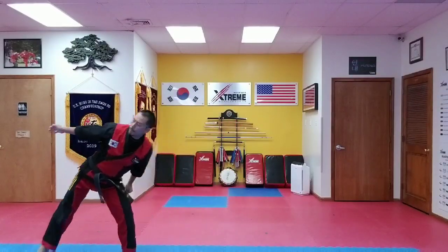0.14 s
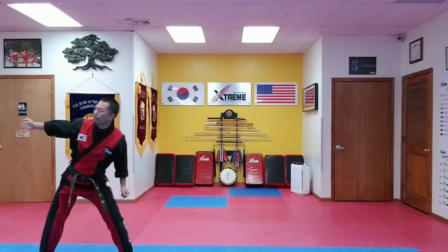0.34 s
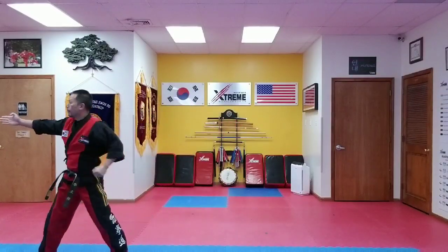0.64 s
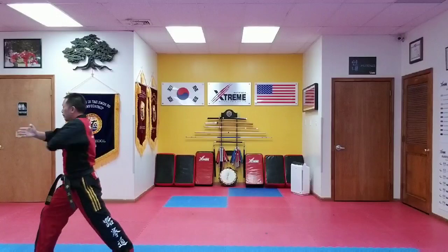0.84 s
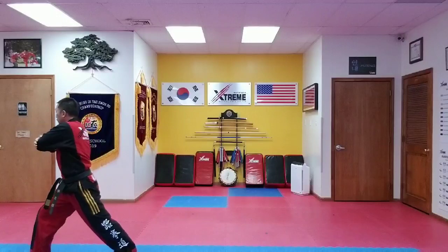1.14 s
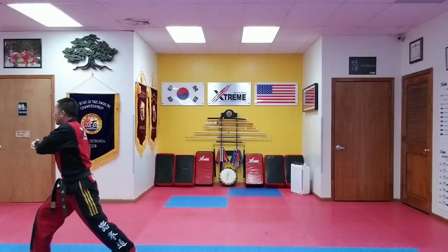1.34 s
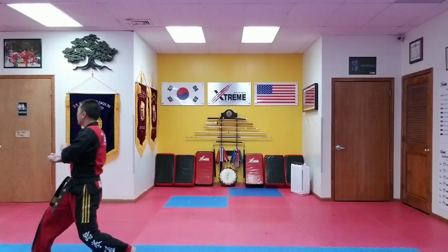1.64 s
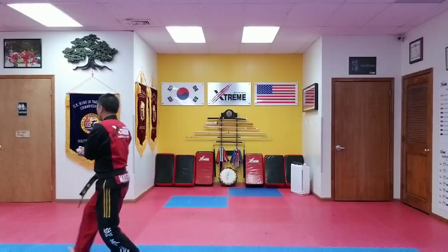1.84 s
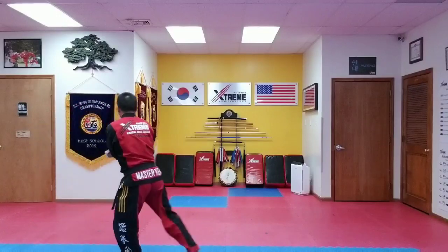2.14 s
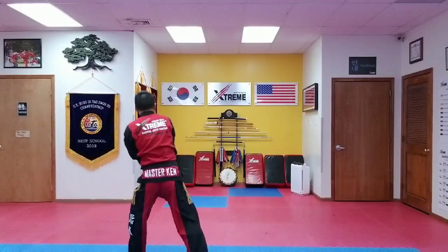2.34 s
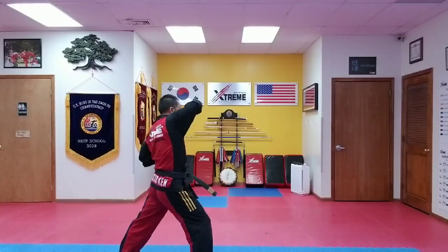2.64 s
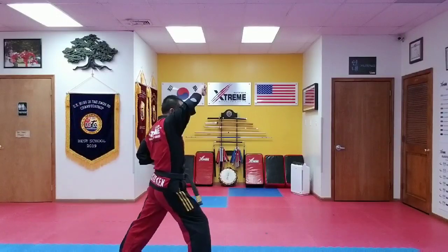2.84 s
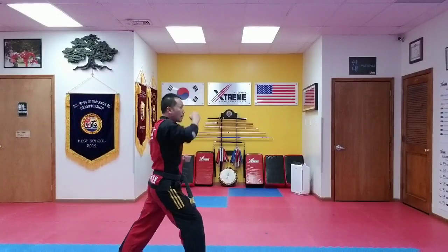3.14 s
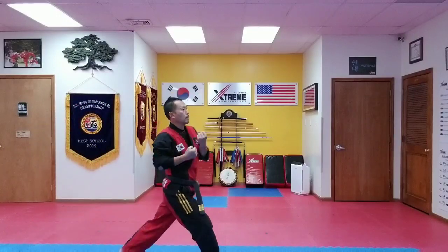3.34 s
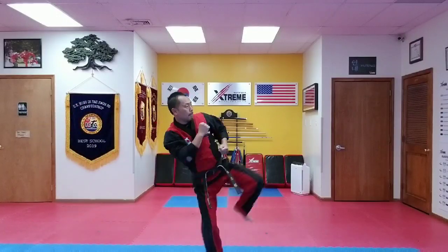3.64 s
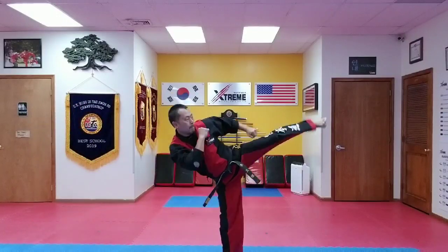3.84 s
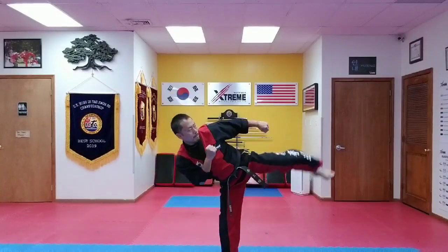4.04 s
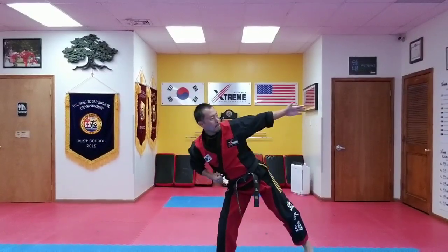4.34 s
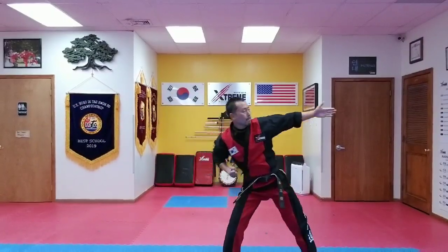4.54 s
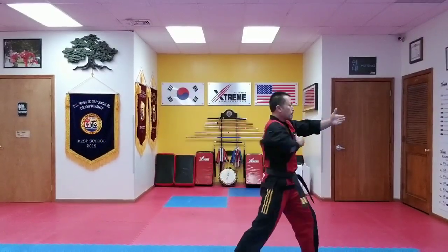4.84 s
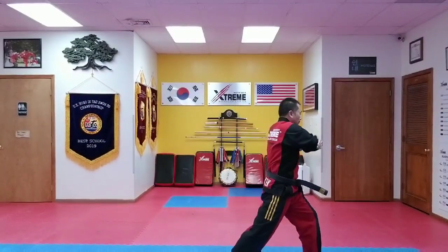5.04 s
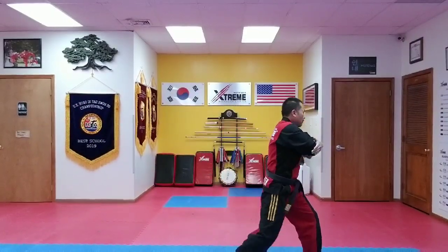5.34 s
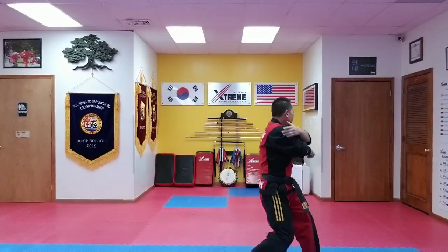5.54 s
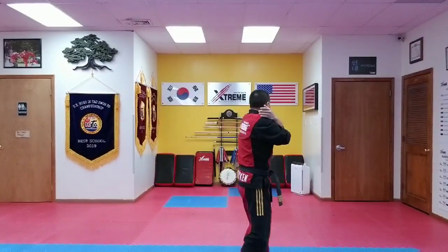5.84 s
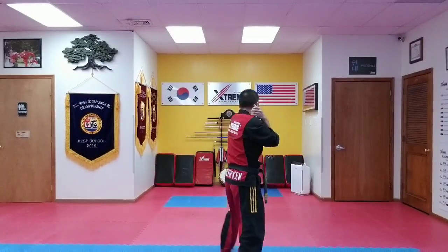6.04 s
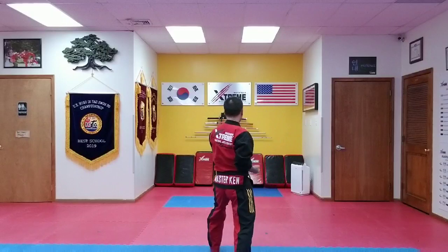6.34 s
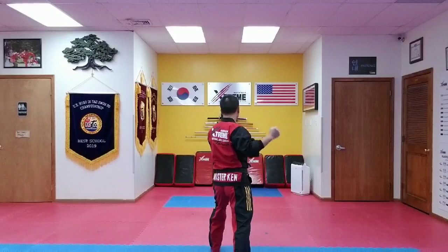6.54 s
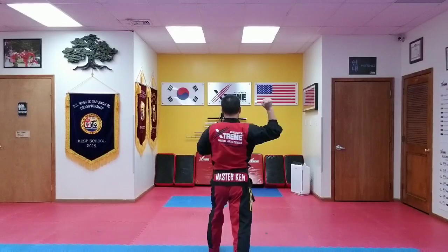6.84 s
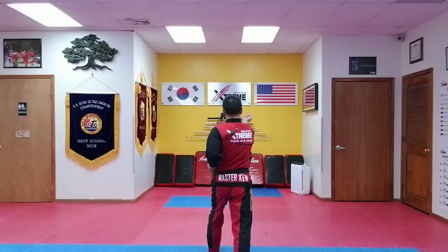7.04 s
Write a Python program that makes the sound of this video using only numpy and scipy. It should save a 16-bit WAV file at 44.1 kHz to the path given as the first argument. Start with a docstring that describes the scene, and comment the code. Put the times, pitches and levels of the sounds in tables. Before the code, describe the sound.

Steady throbbing ventilation lies under bursts of movement from one person on foam mats. Heavy uniform fabric swishes and snaps, bare soles slide in brief airy whisks, and weight lands with dull low thumps. An elbow smacks into a palm near the start and again, harder, past the middle. The room is small, with a quick reflective ring, heard in mono from a few metres away.

```python
"""Air conditioning hums and throbs throughout: beating tones over shaped duct and vent noise.
A martial artist runs through a form on foam mats in a small hall: heavy uniform and bare soles rustle
and brush (grainy noise driven by limb speed), weight lands in soft booms (decaying sines), two elbow
strikes slap the palm and small snaps pop (noise bursts with echoes), pivots whip past (swelling noise bands).
"""
import sys
import numpy as np
from scipy import signal
from scipy.fft import rfft, irfft, next_fast_len
from scipy.io import wavfile
from scipy.ndimage import uniform_filter1d, map_coordinates

SR = 44100
rng = np.random.default_rng(int(sys.argv[2]) if len(sys.argv) > 2 else 0)


def generate_wav(sig):
    """Save sig (samples, or channels by samples) to the path in sys.argv[1] as 16-bit PCM at SR."""
    pcm = np.round(np.clip(np.atleast_2d(sig).T, -1, 1) * 32767).astype(np.int16)
    wavfile.write(sys.argv[1], SR, pcm)


N = 317520


def amp(db):
    """Decibels to gain."""
    return 10 ** (np.asarray(db) / 20)


def unit(x):
    """Scale to rms 1."""
    return x / np.sqrt(np.mean(x ** 2) + 1e-20)


def along(points, hz):
    """Interpolate (f/Hz, value) points on a log frequency axis."""
    f, v = np.transpose(points)
    return np.interp(np.log(hz + 1), np.log(f + 1), v)


def tuned(shape, hz):
    """Place a spectral shape (multiple of pitch, level/dB) at a pitch."""
    return [(multiple * hz, db) for multiple, db in shape]


def wobble(knots_per_s):
    """Smooth random curve through unit-variance normal knots."""
    knots = rng.standard_normal(int(N * knots_per_s / SR) + 4)
    return map_coordinates(knots, [np.arange(N) * knots_per_s / SR])


def filtered(x, response):
    """Multiply the spectrum of x by a response of frequency."""
    size = next_fast_len(N + SR // 2)
    hz = np.fft.rfftfreq(size, 1 / SR)
    return irfft(rfft(x, size) * response(hz), size)[:N]


def coloured(x, spectrum):
    """Shape x by a spectrum, at rms 1."""
    return unit(filtered(x, lambda hz: amp(along(spectrum, hz))))


def impulse(spectrum, size=2048):
    """Minimum-phase click of energy 1 with this spectrum, via the folded cepstrum."""
    hz = np.fft.rfftfreq(size, 1 / SR)
    cepstrum = irfft(np.log(amp(along(spectrum, hz))))
    cepstrum[1:size // 2] *= 2
    cepstrum[size // 2 + 1:] = 0
    click = irfft(np.exp(rfft(cepstrum)))
    return click / np.linalg.norm(click)


def burst(spectrum, life_s, crumble, size=2048):
    """Sharp contact plus decaying noise (amplitude ratio crumble); energy of 1 ms at rms 1."""
    push = rng.standard_normal(size) * np.exp(-np.arange(size) / SR / life_s)
    push *= crumble / np.linalg.norm(push)
    push[0] += 1
    sound = signal.fftconvolve(push, impulse(spectrum))
    return sound / np.linalg.norm(sound) * np.sqrt(SR / 1000)


def add(track, s, sound):
    """Mix a sound into the track at time s."""
    start = max(round(s * SR), 0)
    track[start:start + len(sound)] += sound[:max(N - start, 0)]


# reverberation time: f/Hz, t60/s
HALL_T60 = [(150, 1), (600, 0.31), (2000, 0.41), (4000, 0.46), (8000, 0.32), (15000, 0.37)]
# early wall echoes: delay/s, gain
WALL_ECHOES = [(.0083, 0.34), (0.0142, 0.15), (0.0166, 0.27), (0.024, 0.083), (0.028, .28), (.0318, .2),
               (.039, .18)]


def hall(x, tail_db, build_s):
    """Direct sound, discrete wall echoes, and a diffuse tail that builds up and decays by frequency."""
    hz, t, z = signal.stft(rng.standard_normal(SR * 2 // 3), SR, nperseg=256)
    decay = amp(-60 * t / along(HALL_T60, hz)[:, None])
    onset = 1 - np.exp(-t / build_s)
    tail = signal.istft(z * decay * onset, SR, nperseg=256)[1]
    answer = amp(tail_db) * tail / np.linalg.norm(tail)
    answer[0] += 1
    for delay_s, gain in WALL_ECHOES:
        answer[round(delay_s * SR)] += gain
    return signal.fftconvolve(x, answer)


# machine tones, close neighbours beat: f/Hz, level/dB, phase wander/rad
HUM_TONES = [(41.1, -60, .5), (115.55, -54, .1), (120, -47.4, .1), (126.05, -51.2, .2), (172.3, -54, .7),
             (189.7, -55.5, .5), (231.1, -66, .2), (240, -65, .2), (252.1, -67, .4), (288.9, -58.5, .2),
             (346.6, -54.5, .3), (404.4, -62.5, .3), (462.1, -56.5, .9), (520, -70, .4), (582.1, -64, .9),
             (660.2, -76, .8), (702.1, -65.5, .9)]
# air in the ducts: f/Hz, relative level/dB per Hz
DUCT_SPECTRUM = [(12, -19.5), (25, -16), (45, 0.5), (100, 1), (140, -1.5), (185, 1), (250, -2), (310, -3.5),
                 (420, -7.5), (540, -8), (700, -16), (1000, -25), (1600, -43.5), (4000, -80)]
# vents and microphone: f/Hz, relative level/dB per Hz
HISS_SPECTRUM = [(590, -25), (1000, -4.5), (1840, -8), (1980, -7), (2410, -11.5), (2790, -9.5),
                 (4240, -16.5), (4870, -12.5), (5650, -17), (7810, -18.5), (8670, -28), (12000, -13.5),
                 (15800, -17.5)]


def air_conditioner():
    """Mains and motor tones drift slightly and beat with each other over the rush of the ducts."""
    t = np.arange(N) / SR
    hum = np.zeros(N)
    for hz, db, wander_rad in HUM_TONES:
        phase = 2 * np.pi * (hz * t + rng.random()) + wander_rad * wobble(1.526)
        waver_db = (.5 + 1.6 * min(wander_rad, .6)) * wobble(6)
        hum += amp(db + waver_db) * np.sqrt(2) * np.sin(phase)
    ducts = amp(-50.5 + 1.2 * wobble(5)) * coloured(rng.standard_normal(N), DUCT_SPECTRUM)
    hiss = amp(-73) * coloured(rng.standard_normal(N), HISS_SPECTRUM)
    return hum + ducts + hiss


HOLD_S, FADE_DB = 0.025, 23  # time at full speed; then loss over the fade time
BRAKE_SHARE = 0.24  # final stop, as a share of the fade time


def swing(start, rise, fade):
    """Limb speed over time: gathers pace, holds briefly, slows and comes to rest."""
    t = np.arange(N) / SR - start
    gathering = np.sin(np.pi / 2 * np.clip(t / rise, 0, 1))
    slowed = np.maximum(t - rise - HOLD_S, 0) / fade
    stop = np.clip((1 - slowed) / BRAKE_SHARE + 1, 0, 1)
    return gathering * amp(-FADE_DB * slowed) * stop


def friction(spectrum, grain_db, grain_per_s, patchy_db):
    """Fibres catch and let go: hiss in small clumps, its colour shifting in time and frequency."""
    grains = rng.standard_normal(N) * amp(grain_db * wobble(grain_per_s))
    z = signal.stft(grains, nperseg=512)[2]
    patches = uniform_filter1d(rng.standard_normal(z.shape), size=7, axis=0)
    patches = unit(uniform_filter1d(patches, size=12, axis=1))
    patchy = signal.istft(z * amp(patchy_db * patches), nperseg=512)[1][:N]
    return coloured(patchy, spectrum)


# moves of sleeves, trouser legs and soles, levels before trim:
# t/s, rise/s, fade/s, rustle level/dB, brushing level/dB
STROKE_MOVES = [(.28, .015, 0.61, -71, -74), (.44, 0.025, 0.17, -60.5, -63.5),
                (.715, 0.027, 0.23, -72, -65.5), (.83, .06, 1, -69, -71.5), (1.505, 0.039, .16, -69.5, -71),
                (1.74, 0.036, 0.28, -69.5, -72), (1.872, 0.047, 0.18, -55.5, -55.5),
                (2.345, 0.042, .16, -66, -64), (2.43, .04, 0.23, -61, -71), (2.47, 0.085, 0.39, -63, -61.5),
                (2.64, 0.096, 0.25, -65.5, -72), (3.168, 0.03, 0.36, -70, -63.5),
                (3.24, 0.1, 0.65, -67.5, -84), (3.51, 0.017, 0.39, -66, -73), (3.63, 0.15, 0.21, -61, -62),
                (3.88, 0.063, 0.37, -70, -80), (4.29, 0.044, 0.24, -71, -77),
                (4.635, 0.074, 0.2, -58.5, -64), (4.82, 0.083, .5, -67, -67), (5.485, 0.021, .11, -68, -65),
                (5.56, 0.03, 0.67, -70, -68.5), (5.765, .05, .25, -61.5, -54),
                (5.94, 0.055, 0.11, -80, -66), (6.2, 0.04, 0.14, -64, -64), (6.24, .05, 0.31, -66.5, -76),
                (6.86, 0.043, 0.75, -76, -73.5)]
# rustling folds: f/Hz, relative level/dB per Hz
CLOTH_SPECTRUM = [(400, 3), (850, 2), (1300, -1.5), (1900, -2), (2800, -7.5), (4200, -8.5), (7000, -15.5),
                  (12000, -56)]
# sliding skin and cloth: f/Hz, relative level/dB per Hz
BRUSH_SPECTRUM = [(1000, -42), (3000, -7.5), (5000, -4), (7500, -2), (9000, -6.5), (12000, -0.5),
                  (15500, 0.5)]


def strokes():
    """Each move rustles the folds of the uniform and slides cloth and soles along."""
    rustle, brushing = np.zeros(N), np.zeros(N)
    for start, rise, fade, rustle_db, brush_db in STROKE_MOVES:
        speed = swing(start, rise, fade)
        # overlapping moves add in power
        rustle = np.hypot(rustle, amp(rustle_db) * speed)
        brushing = np.hypot(brushing, amp(brush_db) * speed)
    cloth = friction(CLOTH_SPECTRUM, grain_db=0.4, grain_per_s=240, patchy_db=2.9)
    skin = friction(BRUSH_SPECTRUM, grain_db=0.9, grain_per_s=700, patchy_db=2.5)
    folds = amp(0.94) * rustle * cloth
    slides = amp(0.86) * brushing * skin
    return folds + slides + creases(rustle)


# pop of taut or buckling cloth: multiple of pitch, relative level/dB per Hz
POP_SHAPE = [(.2, -27), (.6, 5.5), (1, -2), (1.4, -4), (2, -17.5), (3.5, -33), (10, -53)]
CREASES_PER_S, CREASE_HZ = 33, 1600
CREASE_DB, CREASE_SPREAD_DB = -2, 0.5  # relative to the rustle


def creases(rustle):
    """Folds buckle at random moments, as loud as the cloth is moving."""
    chance, size = rng.random(N), rng.standard_normal(N)
    level = amp(CREASE_DB + CREASE_SPREAD_DB * size) * rustle
    buckles = (chance < CREASES_PER_S / SR) * level
    pop = burst(tuned(POP_SHAPE, CREASE_HZ), life_s=0.0016, crumble=0.43)
    pops = signal.fftconvolve(buckles, pop)
    return hall(pops, tail_db=2, build_s=.015)[:N]


# weight landing on the mats, level before trim: t/s, level/dB, f/Hz
FOOTFALLS = [(0.442, -49, 84), (2.40, -33.5, 90.7), (4.701, -35, 76), (4.78, -49, 30), (4.83, -38.5, 45.1),
             (4.93, -42, 61.8), (5.041, -38, 59.4), (5.198, -38, 57.2), (5.66, -39.5, 51.4),
             (5.76, -46, 36.8), (6.269, -38.5, 70), (6.94, -42, 79)]
BOOM_CYCLES = 32  # cycles per 60 dB of decay


def steps():
    """Foam softens each footfall's attack, leaving a boom of floor and room; deep ones last longest."""
    track, t = np.zeros(N), np.arange(SR * 2 // 3) / SR
    attack = 1 - np.exp(-t / 0.035)
    for s, db, hz in FOOTFALLS:
        boom = np.sin(2 * np.pi * hz * t) + .3 * np.sin(2 * np.pi * hz * 1.45 * t)
        decay = amp(db - 60 * t * hz / BOOM_CYCLES)
        add(track, s, decay * attack * boom)
    return amp(2.5) * track


# elbow strikes into the palm: t/s, smack level/dB, cupped-hand f/Hz, crack level/dB
ELBOW_STRIKES = [(1.0334, -32, 1210, -52.5), (5.0231, -29.5, 1460, -42)]
# contacts of forearm, fingers, then sleeve: delay/s, smack offset/dB, crack offset/dB
STRIKE_CONTACTS = [(0, 1, 2), (.0022, -4, -2.5), (.0088, -9.5, 1.5), (0.0157, -14.5, -9)]
# air trapped in the palm: multiple of pitch, relative level/dB per Hz
PALM_SHAPE = [(.04, -36), (.1, -2), (.2, 11), (.42, 8.5), (.75, 5.5), (1.15, 2), (1.8, -2), (2.4, -15),
              (4, -29), (7, -32.5), (12, -48)]
# skin and sleeve: f/Hz, relative level/dB per Hz
CRACK_SPECTRUM = [(1000, -5), (2200, 6), (3800, 0), (6000, -5), (9000, -9), (15000, -10.5)]


def slaps():
    """The forearm lands in the palm: trapped air smacks, skin and sleeve crack, and the hall answers."""
    track = np.zeros(N)
    for s, smack_db, hz, crack_db in ELBOW_STRIKES:
        for delay_s, push_db, sting_db in STRIKE_CONTACTS:
            smack = burst(tuned(PALM_SHAPE, hz), life_s=.002, crumble=.35)
            smack = amp(smack_db + push_db) * hall(smack, tail_db=1.5, build_s=.014)
            crack = burst(CRACK_SPECTRUM, life_s=.002, crumble=1.9)
            crack = amp(crack_db + sting_db) * hall(crack, tail_db=2.5, build_s=.006)
            add(track, s + delay_s, smack + crack)
    return track


# snaps of cloth, belt and toes: t/s, pop level/dB, pop f/Hz, tick level/dB
SMALL_SNAPS = [(1.518, -61, 2000, -59), (1.8343, -71, 3000, -55), (2.2404, -54, 1500, -75),
               (2.3497, -58, 2490, -51), (2.3956, -48, 1460, -63), (2.396, -47.5, 3280, -71),
               (2.4619, -45, 1100, -72), (2.479, -49, 1680, -72), (2.7525, -49.5, 1260, -71),
               (3.1768, -75, 5570, -48), (3.398, -54, 1300, -75), (3.516, -51.5, 1870, -60),
               (3.945, -46, 950, -90), (4.6649, -46.5, 1100, -55), (4.7198, -46.5, 1770, -58),
               (5.5005, -50, 1760, -68), (5.6571, -52, 1300, -75), (5.6761, -50.5, 1630, -70),
               (5.7185, -62, 6000, -49.5)]
# fine tick: f/Hz, relative level/dB per Hz
TICK_SPECTRUM = [(1500, -32), (4000, -2), (6500, 6), (9000, -2), (15000, 6.5)]


def snaps():
    """Cloth pulls taut and toes peel off the vinyl: a dull pop with a fine tick."""
    track = np.zeros(N)
    for s, pop_db, hz, tick_db in SMALL_SNAPS:
        pop = amp(pop_db) * burst(tuned(POP_SHAPE, hz), life_s=0.0036, crumble=0.67)
        tick = amp(tick_db) * burst(TICK_SPECTRUM, life_s=0.0017, crumble=0.99)
        add(track, s, hall(pop + tick, tail_db=-7, build_s=.015))
    return track


# pivoting soles and whipping sleeves: t/s, level/dB, Gaussian half length/s, f/Hz
PIVOT_SLIDES = [(1.914, -48, 0.02, 15500), (1.915, -58, 0.018, 7800), (1.948, -62, 0.016, 4300),
                (3.767, -68, 0.039, 2660), (4.733, -66.5, 0.028, 3400), (5.788, -64.5, .01, 5700),
                (5.834, -62, 0.035, 2140), (5.86, -60, 0.028, 13500)]
# band of sliding noise: multiple of pitch, relative level/dB per Hz
VINYL_SHAPE = [(.3, -52), (.6, -11), (.82, -7), (1, -2.5), (1.2, -8.5), (1.7, -19), (3, -35)]


def pivots():
    """A quick slide swells and fades as a band of grainy noise at its own pitch."""
    t = np.arange(N) / SR
    track = np.zeros(N)
    for s, db, half_s, hz in PIVOT_SLIDES:
        pressure = amp(db) * np.exp(-.5 * ((t - s) / half_s) ** 2)
        grain = friction(tuned(VINYL_SHAPE, hz), grain_db=2.0, grain_per_s=600, patchy_db=-1.0)
        track += pressure * grain
    return track


def scene():
    """The form over the steady hum of the hall, one channel."""
    moves = strokes() + pivots() + slaps() + snaps() + steps()
    return (air_conditioner() + moves)[None]


TOP_HZ = 15900


def record(dry):
    """Band limit: nothing passes at or above TOP_HZ."""
    return np.array([filtered(channel, lambda hz: hz < TOP_HZ) for channel in dry])


dry = scene()
out = record(dry)
generate_wav(out)
```